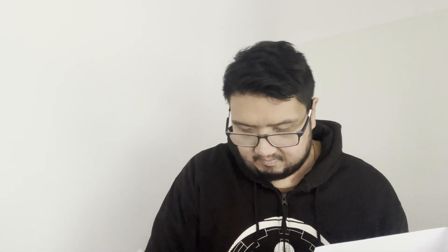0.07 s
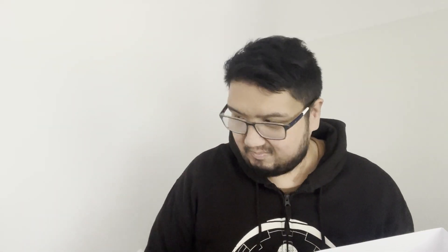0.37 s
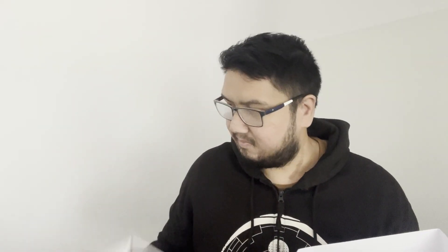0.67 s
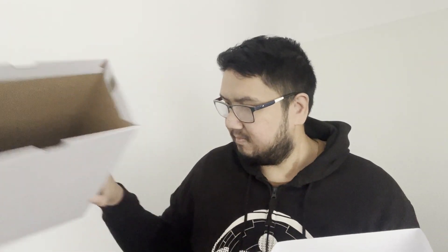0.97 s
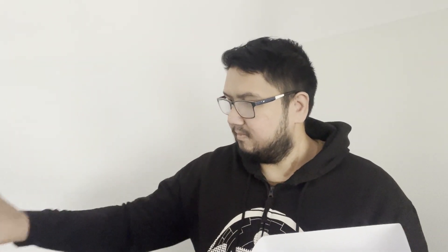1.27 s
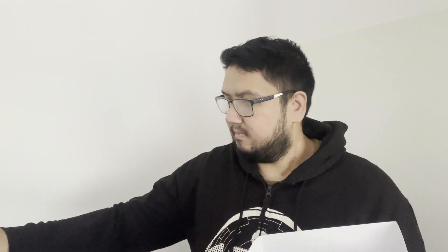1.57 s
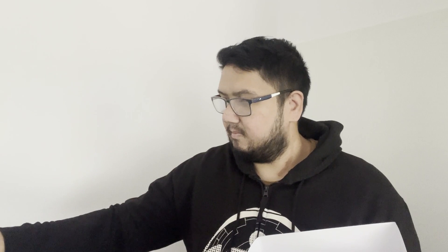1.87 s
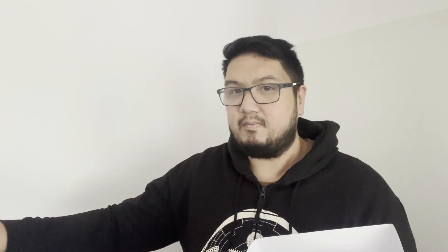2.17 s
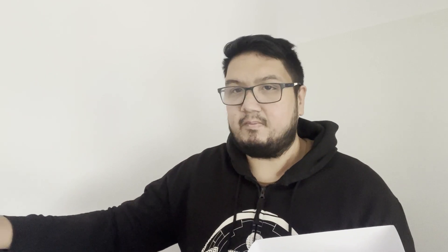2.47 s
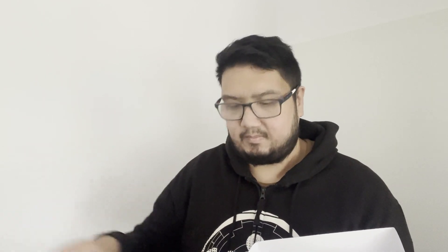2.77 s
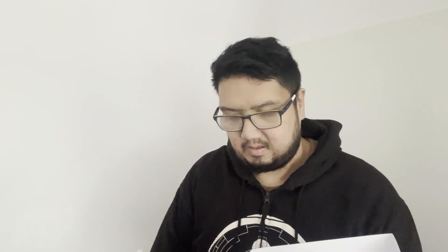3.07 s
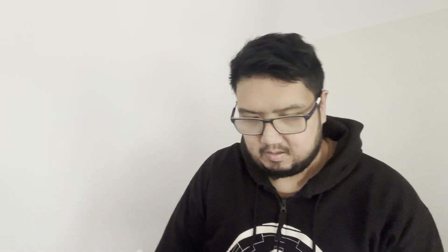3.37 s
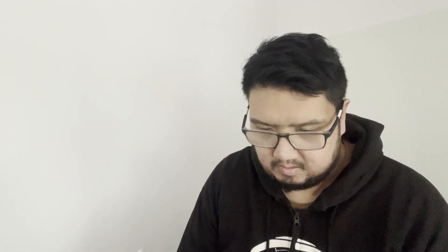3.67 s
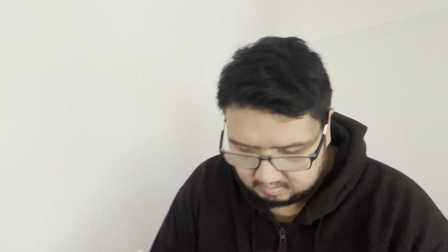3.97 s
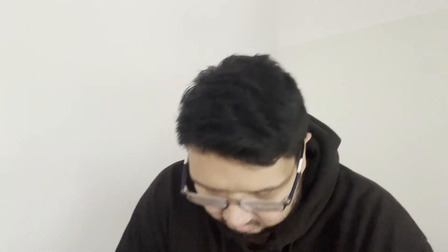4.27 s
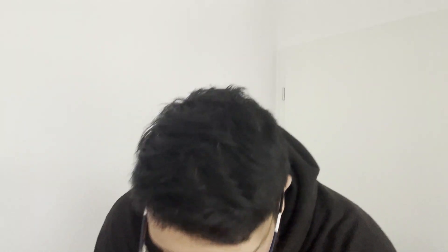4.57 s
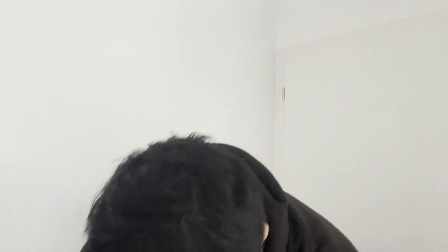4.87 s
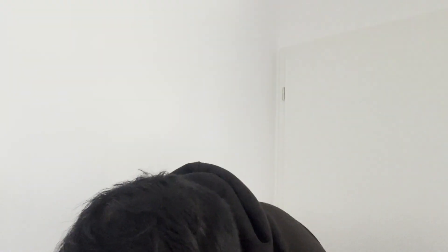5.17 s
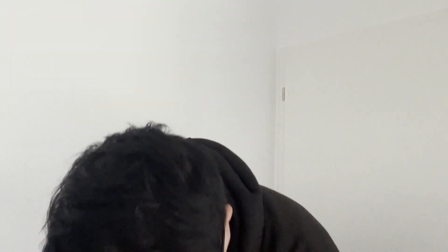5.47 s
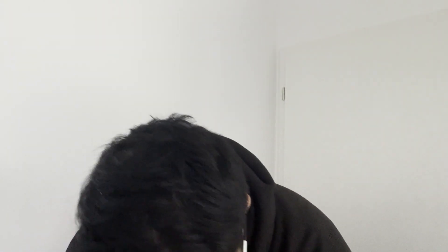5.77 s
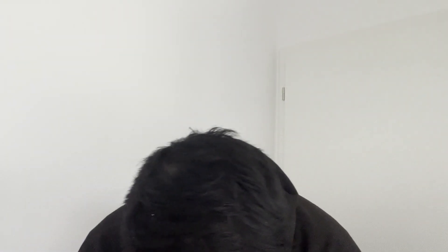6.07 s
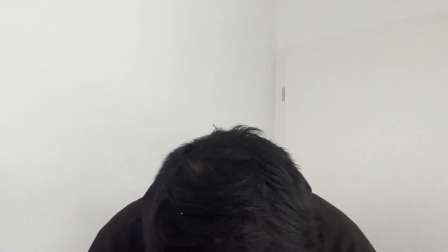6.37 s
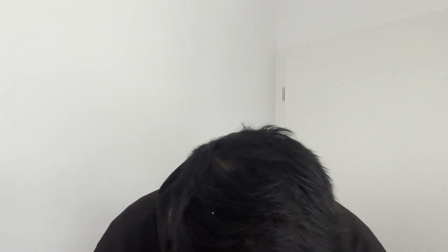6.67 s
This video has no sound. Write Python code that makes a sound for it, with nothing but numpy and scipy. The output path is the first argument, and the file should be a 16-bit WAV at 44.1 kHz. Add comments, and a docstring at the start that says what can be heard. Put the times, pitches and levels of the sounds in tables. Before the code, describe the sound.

Cardboard bumps and rubs as an empty box is lifted, then set down and tipped over on the left with two hollow knocks and a short skid. Slightly right of centre, hands dig through paper wrapping in a second box: hissing, crinkling and sharp crease snaps, mixed with scraping card and more knocks. The table rumbles softly underneath. Heard in stereo through two closely spaced microphones in a small bare room.

```python
"""A hollow bump and a rub of card: an empty cardboard box is lifted, set down on a table and tipped over,
off to the left. Then, a little right of centre, hands dig through paper wrapping in a second box.
Sliding card sticks and slips into its panel resonances, knocks ring the hollow box, paper hisses and its
creases snap, the table rumbles. Heard in a small bare room through two closely spaced microphones."""
import sys
import numpy as np
from scipy import signal
from scipy.fft import rfft, irfft, next_fast_len
from scipy.io import wavfile
from scipy.ndimage import uniform_filter1d, map_coordinates

SR = 44100
rng = np.random.default_rng(int(sys.argv[2]) if len(sys.argv) > 2 else 0)


def store_wav(level_fs):
    """Save 16-bit WAV to argv[1]."""
    pcm = np.round(np.clip(np.atleast_2d(level_fs), -1, 1) * 32767)
    wavfile.write(sys.argv[1], SR, pcm.T.astype(np.int16))


N = 305172
TOP_HZ = 16300  # nothing is heard above this


def amp(db):
    """Decibels to gain."""
    return 10 ** (np.asarray(db) / 20)


def unit(x):
    """Scale to rms 1."""
    return x / np.sqrt(np.mean(x ** 2) + 1e-20)


def along(points, hz):
    """Read (Hz, value) points on a log frequency axis."""
    point_hz, values = np.transpose(points)
    return np.interp(np.log(hz + 1), np.log(point_hz + 1), values)


def wobble(rate):
    """A smooth, bounded random curve, rate knots a second."""
    knots = 2 * np.tanh(rng.standard_normal(int(N * rate / SR) + 4) / 2)
    return map_coordinates(knots, [np.arange(N) * rate / SR])


def filtered(x, response):
    """Multiply the spectrum of x by response(hz)."""
    size = x.shape[-1]
    padded = next_fast_len(size + 8192)
    return irfft(rfft(x, padded) * response(np.fft.rfftfreq(padded, 1 / SR)), padded)[..., :size]


def add(track, s, sound):
    """Mix a sound into a track at s seconds."""
    start = max(round(s * SR), 0)
    part = sound[..., :max(N - start, 0)]
    track[:, start:start + part.shape[-1]] += part


# Resonances of bending card. Each row: centre in Hz, width in Hz, lift in dB when ring is 1.
PANEL_RESONANCES = [(179.7, 18, 11.5), (348, 40, 4.5), (500.6, 20, 8), (704, 48, 4.5), (860, 45, 4),
                    (1035, 23, 2.5), (1623, 62, 2.5)]
def coloured(x, spectrum, ring=0, size=4096):
    """Minimum-phase colour from (Hz, dB) points; ring lets the panel resonances stand out."""
    hz = np.fft.rfftfreq(size, 1 / SR)
    peaks_db = sum(db / (1 + (2 * (hz - centre) / width) ** 2) for centre, width, db in PANEL_RESONANCES)
    cepstrum = irfft(np.log(amp(along(spectrum, hz) + ring * peaks_db)))
    cepstrum[1:size // 2] *= 2
    cepstrum[size // 2 + 1:] = 0
    response = irfft(np.exp(rfft(cepstrum)))
    return signal.fftconvolve(x, response[None], axes=1)[:, :x.shape[1]]


# How alike left and right sound: wide in the middle, nearly mono in the treble.
# Each row: frequency in Hz, left-right correlation.
STEREO_LIKENESS = [(130, 0.94), (290, 0.77), (640, 0.48), (3000, 0.53), (5500, 0.15), (7500, 0.87),
                   (15000, 0.86)]
# The treble sounds centred. Each row: frequency in Hz, share of the left-right delay that applies there.
STEREO_LAG_SHARE = [(100, .3), (500, 1), (5200, 1), (7000, 0)]
def spread(pair, lag_ms=0.072):
    """Two unrelated signals become left and right, partly alike, the left later by up to lag_ms."""
    def blend(hz):
        angle = np.arccos(np.clip(along(STEREO_LIKENESS, hz), 0, 1)) / 2
        return np.array([np.cos(angle), np.sin(angle)])

    def delay(hz):
        lag_s = along(STEREO_LAG_SHARE, hz) * lag_ms / 1000
        return np.exp(1j * np.pi * hz * lag_s * np.array([[-1], [1]]))

    mid, side = filtered(pair, blend)
    return filtered(np.array([mid + side, mid - side]), delay)


def placed(pair, aside_from_s=0.796, aside_until_s=2.9):
    """Sound comes from the left while the empty box is aside, otherwise from a little to the right."""
    t = np.arange(N) / SR
    aside = uniform_filter1d(1. * ((t > aside_from_s) & (t < aside_until_s)), SR // 20)
    from_left = spread(pair * aside, lag_ms=-0.28) * amp([[.8], [-.4]])
    return from_left + spread(pair * (1 - aside), lag_ms=0.077)


def noise(spectrum):
    """Steady stereo noise, rms 1."""
    return unit(spread(coloured(rng.standard_normal((2, N)), spectrum)))


# The still room. Each row: frequency in Hz, relative density in dB.
ROOM_TONE_SPECTRUM = [(15, -41), (35, -8), (277, -7.5), (677, -24.5), (7920, -35.5), (10400, -56)]
def room_tone():
    """A faint, low hush all around the microphones."""
    return amp(-73.0) * noise(ROOM_TONE_SPECTRUM)


# Decay between the bare walls. Each row: frequency in Hz, seconds to fall 60 dB.
WALL_T60 = [(100, 0.134), (300, 0.58), (1000, 0.27), (4000, 0.6), (12000, 0.37)]
def room_echo(x):
    """The nearby walls answer 4 ms after the direct sound, each frequency dying at its own speed."""
    hz, t, bands = signal.stft(rng.standard_normal((2, SR * 3 // 4)), SR, nperseg=256)
    tail = signal.istft(bands * amp(-60 * t / along(WALL_T60, hz)[:, None]), SR, nperseg=256)[1]
    tail = np.pad(tail / np.linalg.norm(tail[0]), ((0, 0), (SR // 250, 0)))
    return spread(signal.fftconvolve(x.mean(0)[None], tail, axes=1)[:, :N])


# Rumble of the table under the boxes. Each row: frequency in Hz, relative density in dB.
RUMBLE_SPECTRUM = [(24, -47), (38, -3.5), (58, -8), (73, 7), (92, -5), (125, 0.5), (220, -62.5)]
# Weight landing on the table. Each row: start in seconds, level in dB.
TABLE_THUMPS = [(0.06, -34.5), (0.127, -32.5), (1.306, -36), (1.772, -37), (3.753, -39), (4.345, -30),
                (4.895, -34), (5.42, -35.5), (6.777, -39)]
def table_top(flex_gain, mode_hz=71.9, t60=0.25, rise_s=0.0051):
    """The table rumbles as the panels are worked and booms in its lowest mode when weight lands on it."""
    track = amp(-28.0) * (flex_gain + amp(-85.0)) ** 0.48 * noise(RUMBLE_SPECTRUM)
    t = np.arange(SR // 2) / SR
    boom = np.sin(2 * np.pi * mode_hz * t) * amp(-60 * t / t60) * (1 - np.exp(-t / rise_s))
    for s, db in TABLE_THUMPS:
        add(track, s, amp(db) * boom)
    return track


def burst(spectrum, t60, linger_db, linger_t60, ring=0):
    """A contact: a sharp crack and a weaker shiver after it, rms 1 at the start."""
    t = np.arange(SR // 3) / SR
    fade = amp(-60 * t / t60) + amp(linger_db - 60 * t / linger_t60)
    sound = coloured(rng.standard_normal((2, len(t))) * fade, spectrum, ring)
    return sound / np.sqrt(np.mean(sound[:, :SR // 250] ** 2))


# Thin paper ticking and stiff card cracking. Each row: frequency in Hz, relative density in dB.
TICK_SPECTRUM = [(900, -43), (2000, -3), (5000, 12.5), (8500, 11), (11000, -8.5), (16000, -5)]
CRACK_SPECTRUM = [(300, -10), (900, 6), (1700, 6.5), (3200, 0.5), (6500, -23)]
# The loudest creases and edges. Each row: start in seconds, tick level in dB, crack over the tick in dB.
CREASE_SNAPS = [(0.534, -76, 11), (0.96, -69, 14.5), (1.3012, -36, -4), (1.57, -54.5, -2.5),
                (1.939, -54, 0.5), (3.035, -58.5, -7), (3.4245, -43.5, -4), (3.4775, -38.5, -5),
                (3.49, -39, -6.5), (3.5328, -38.5, -12), (3.747, -51.5, 6.5), (4.0045, -41, -6.5),
                (4.022, -48, -4), (4.055, -42.5, -3), (4.675, -51.5, 4), (4.9253, -33, 2.5),
                (5.3491, -33, 1), (6.131, -44, -1), (6.25, -42, -15), (6.286, -43, -9),
                (6.499, -47.5, 10.5), (6.8394, -50.5, 10)]
def snaps(paper_gain, buckles_per_s=20, push_limit_db=-52):
    """Creases buckle with a dry tick, stiff card adds a lower crack; small ones give way at random."""
    track = np.zeros((2, N))
    for s, db, crack_db in CREASE_SNAPS:
        tick = burst(TICK_SPECTRUM, t60=.014, linger_db=-16, linger_t60=.12)
        crack = burst(CRACK_SPECTRUM, t60=.03, linger_db=-13, linger_t60=.12)
        add(track, s, amp(db) * (tick + amp(crack_db) * crack))
    push = np.minimum(paper_gain, amp(push_limit_db))  # pushing harder makes a small crease no louder
    gives_way = rng.random(N) < buckles_per_s / SR
    buckles = gives_way * push * amp(-2.5 + 6 * rng.random(N))
    tick, crack = (burst(spectrum, t60=0.0083, linger_db=-25.0, linger_t60=0.1)
                   for spectrum in (TICK_SPECTRUM, CRACK_SPECTRUM))
    small_snaps = signal.fftconvolve(buckles[None], tick + crack / 2, axes=1)[:, :N]
    return placed(track + small_snaps)


def crinkles(rate, pitch_hz, octaves, cycles, size_db):
    """Tiny facets of paper flip over, rate a second, each ringing for a few cycles at its own pitch."""
    count = int(rate * N / SR)
    when, pitch, size, side = rng.random((count, 4)).T[:, :, None]
    hz = np.minimum(pitch_hz * 2 ** (octaves * (2 * pitch - 1)), TOP_HZ)
    step = np.arange(SR // 150)
    turns = hz * step / SR
    strength = amp(-size_db * np.log(np.maximum(size, .02)))
    grains = strength * np.sin(2 * np.pi * turns) * np.exp(-turns / cycles)
    where = ((when * N).astype(int) + step).ravel()
    shares = np.cos(2 * np.pi * side), np.sin(2 * np.pi * side)
    return unit(np.array([np.bincount(where, (grains * share).ravel(), N)[:N] for share in shares]))


def crumpling(gain, flurry_db=-13.5, settle_s=.022):
    """Larger folds pop in clumps under the hands, and in a flurry after each loud snap."""
    t = np.arange(N) / SR
    flurries = sum((t > s) * amp(db + flurry_db) * np.exp(-np.abs(t - s) / settle_s)
                   for s, db, _ in CREASE_SNAPS)
    folds = crinkles(rate=400, pitch_hz=3000, octaves=1.5, cycles=5.5, size_db=3.8)
    clumps = amp(3.3 * wobble(30))
    return np.hypot(amp(-8.5) * gain, flurries) * unit(folds * clumps)


def slips(rate, size_db, smooth, clump_db, clump_rate):
    """Stick-slip: tiny jolts of uneven size, rate a second, coming in clumps over a smooth rub."""
    jolts = (rng.random(N) < rate / SR) * amp(size_db * np.minimum(rng.exponential(size=N), 4))
    rub = unit(jolts * rng.standard_normal((2, N))) + smooth * rng.standard_normal((2, N))
    return rub * amp(clump_db * wobble(clump_rate))


def box_echoes(x, depth, longest_s, rate, count=6):
    """Short echoes between the box walls come and go as the hands move, shifting the colour."""
    delays = (rng.uniform(.15, 1, count) * longest_s * SR).astype(int)
    return unit(x + sum(depth * wobble(rate) * np.roll(x, delay, axis=1) for delay in delays))


# Paper rubbing inside the box. Each row: frequency in Hz, relative density in dB.
HISS_SPECTRUM = [(1760, -33.5), (3000, -13), (5140, 1), (8280, 3.5), (9870, 0.5), (11800, -7),
                 (15100, -9.5), (16000, -28.5)]
def paper_hiss(slipping):
    """Sliding paper hisses while its smallest facets crinkle."""
    rub = box_echoes(coloured(slipping, HISS_SPECTRUM), depth=0.2, longest_s=.003, rate=12)
    facets = crinkles(rate=900, pitch_hz=5790, octaves=1.1, cycles=1.9, size_db=3.5)
    clumps = amp(3.2 * wobble(25))
    return unit(rub + 0.28 * facets * clumps)


# Card sliding along card with a hollow note. Each row: time of the peak in seconds, length in seconds,
# pitch at the peak in Hz, glide in octaves per second, peak level in dB.
CARD_SLIDES = [(1.05, 0.044, 5650, 2, -64), (3.2, .035, 1210, -4.5, -48), (4.144, .08, 1540, -2, -50),
               (4.275, 0.14, 980, -2, -42.5), (5.22, 0.23, 520, 0.5, -38), (5.331, 0.26, 190, -0.5, -39),
               (5.839, .05, 1110, -6.5, -36), (5.98, .13, 194, -1, -39), (6.33, .36, 498, -0.5, -50)]
def slides():
    """A push swells and fades in one broad card resonance, most often sinking as the panel comes free."""
    track = np.zeros((2, N))
    for s, length, hz, glide, db in CARD_SLIDES:
        t = np.arange(-length, length, 1 / SR)
        rub = slips(rate=630, size_db=2.5, smooth=0.79, clump_db=3.0, clump_rate=59.4)[:, :SR]
        note = unit(filtered(rub, lambda f: 1 / (1 + (2.83 * (f - hz) / hz) ** 2)))
        clock = np.cumsum(2 ** (glide * t))
        gliding = np.array([np.interp(clock, np.arange(SR), channel) for channel in note])
        add(track, s - length, amp(db) * np.exp(-(2 * t / length) ** 2) * gliding)
    return track


# Movements of the hands on card and paper. Each row: start, rise and hold in seconds, scrape level in dB,
# panel flex and paper hiss in dB over the scrape.
HAND_STROKES = [ (0.0, 0.00034, 0.051, -47.5, 2.5, -9.5), (0.048, 0.029, 0.21, -60.5, 8.5, -4.5),
                (0.938, 0.02, 0.37, -63, -5.5, -12.5), (1.221, 0.14, 0.011, -51.5, 3, -12),
                (1.714, 0.028, 0.065, -52.5, 2, -3.5), (2.967, 0.23, 0.075, -59.5, -3, -12),
                (3.178, 0.006, 0.035, -49, -4, -3), (3.222, 0.12, 0.35, -52.5, -5, -5),
                (3.473, 0.018, 0.12, -57, -5, 10.5), (3.708, 0.13, 0.039, -52.5, -0.5, -3),
                (3.88, 0.055, 0.21, -55, 0.5, -8), (4.077, 0.054, 0.15, -51.5, 1.5, -5.5),
                (4.269, 0.044, 0.03, -46.5, 0.5, -3.5), (4.336, 0.16, 0.3, -51, 3.5, 2.5),
                (4.804, 0.11, 0.091, -51, 5, 2.5), (4.95, 0.2, 0.17, -36.5, -1.5, -6.5),
                (5.3, 0.053, 0.034, -37, -2.5, -8), (5.502, 0.021, 0.047, -37.5, -8.5, -5),
                (5.638, 0.073, 0.028, -53.5, 3, -4), (5.792, 0.026, 0.072, -37, -3.5, -6),
                (5.891, 0.068, 0.02, -36, 0.5, -4.5), (6.024, 0.091, 0.41, -50.5, -1, -4.5),
                (6.295, 0.22, 0.031, -49.5, 5.5, 4.5), (6.6, 0.029, 0.26, -53, -1, -2), ]
# The box skidding. Each row: start and length in seconds, scrape level in dB, fade in dB per second.
BOX_SKIDS = [(1.299, 0.38, -45, 66.5), (1.753, .7, -54.5, 42.2)]
def effort(release_db_per_s=227, skid_flex_db=1.5, skid_paper_db=-7):
    """Gains of scrape, flex and hiss: strokes rise, hold and die as the hand lets go; skids fade."""
    t, power = np.arange(N) / SR, np.zeros((3, N))
    for s, rise, hold, db, flex_db, paper_db in HAND_STROKES:
        age = np.maximum(t - s, 0)
        fall_db = release_db_per_s * np.clip(age - rise - hold, 0, 1)
        stroke = np.minimum(age / rise, 1) * amp(db - fall_db)
        power += np.outer(amp([0, flex_db, paper_db]), stroke) ** 2
    for s, length, db, fade in BOX_SKIDS:
        skid = (t > s) * (t < s + length) * amp(db - fade * np.abs(t - s))
        power += np.outer(amp([0, skid_flex_db, skid_paper_db]), skid) ** 2
    return np.sqrt(power)


# Panels flexing and card scraping. Each row: frequency in Hz, relative density in dB.
FLEX_SPECTRUM = [(60, -51.5), (125, 1.5), (270, -1), (430, -8), (600, -31.5), (1200, -59.5)]
SCRAPE_SPECTRUM = [(200, -43), (400, -16), (520, -6), (950, -4), (2100, -11.5), (4800, -20), (9000, -82.5)]
def handling(scrape_gain, flex_gain, paper_gain):
    """Coarse slips flex the panels; mixed with finer ones they scrape the card and rub the paper."""
    coarse = slips(rate=800, size_db=-0.5, smooth=0.97, clump_db=1.87, clump_rate=55)
    fine = slips(rate=1800, size_db=1.5, smooth=1.0, clump_db=2.5, clump_rate=69)
    flex = flex_gain * unit(coloured(coarse, FLEX_SPECTRUM, ring=0.91))
    card = coloured(coarse + 0.61 * fine, SCRAPE_SPECTRUM, ring=0.6)
    scrape = scrape_gain * box_echoes(card, depth=0.3, longest_s=.005, rate=10)
    paper = paper_gain * paper_hiss(fine + 0.4 * coarse)
    return placed(flex + scrape + paper + slides() + crumpling(np.sqrt(scrape_gain * paper_gain)))


# Modes of the hollow box. Each row: frequency in Hz, relative level in dB, seconds to fall 60 dB.
BOX_MODES = [(138, 8.5, 0.1), (193.8, 1, 0.19), (271, 3.5, 0.13), (360, 7, 0.087), (429.7, -3.5, 0.2),
             (493.7, 9, 0.097), (810, 11, 0.075)]
# Card bumping against table, hands and contents; a landing runs from corner to face.
# Each row: start in seconds, thud level in dB, pitch in Hz, clap level in dB.
BOX_KNOCKS = [(0.002, -42, 328, -44.5), (0.249, -54, 463, -50), (0.315, -51, 550, -66),
              (1.288, -39, 475, -47.5), (1.302, -35, 700, -31.5), (1.313, -30, 245, -58),
              (1.345, -37, 260, -62), (1.711, -48.5, 260, -57), (1.7506, -35.5, 486, -43.5),
              (1.767, -38.5, 109, -68), (1.772, -39.5, 332, -60), (1.797, -42.5, 270, -62.5),
              (3.394, -44, 260, -52), (3.745, -49, 187, -54), (4.464, -36.5, 235, -44),
              (4.71, -42, 206, -46), (4.924, -30.5, 224, -31.5), (5.021, -32.5, 430, -36.5),
              (5.088, -33, 400, -46), (5.14, -34.5, 292, -34), (5.327, -40.5, 597, -41),
              (5.348, -48, 686, -27), (5.836, -41, 410, -42), (5.962, -37, 316, -31.5),
              (6.496, -40, 340, -33), (6.771, -41, 174, -42.5)]
def knocks():
    """A bump claps the card and rings the box modes near its pitch: a stiff corner high, a face low."""
    thuds, claps, t = np.zeros((2, N)), np.zeros((2, N)), np.arange(SR // 3) / SR
    hz, level, t60 = np.transpose(BOX_MODES)[:, :, None]
    for s, thud_db, pitch_hz, clap_db in BOX_KNOCKS:
        contact = [(pitch_hz / 3, -17), (pitch_hz, 0), (pitch_hz * 3, -26), (TOP_HZ, -90)]  # (Hz, dB)
        strength, detune, phase = rng.standard_normal((3, len(BOX_MODES), 1))  # grip shifts the modes
        fade = amp(level + along(contact, hz) + 2 * strength - 60 * t / t60)
        modes = np.sin(2 * np.pi * (hz * (1 + 0.027 * detune) * t + phase))
        ring = np.sum(fade * modes, 0) * (1 - np.exp(-2 * t * pitch_hz))
        ring /= np.std(ring[:SR // 50])
        jolt = burst(contact, t60=0.11, linger_db=-22.0, linger_t60=.2)
        jolt /= np.std(jolt[:, :SR // 50])
        add(thuds, s, amp(thud_db) * (ring * np.array([[1], [.6]]) + .33 * jolt))
        clap = burst(SCRAPE_SPECTRUM, t60=0.12, linger_db=-11.0, linger_t60=0.081, ring=1.0)
        add(claps, s, amp(clap_db) * clap)
    return placed(thuds), placed(claps)


def scene():
    """Rubbing, bumps and snaps in the small room, over the table's rumble and the room tone."""
    scrape_gain, flex_gain, paper_gain = effort()
    rubbing = handling(scrape_gain, flex_gain, paper_gain)
    thuds, claps = knocks()
    ticks = snaps(paper_gain)
    echo = room_echo(amp(-8.5) * rubbing + amp(-13.0) * thuds + amp(-6.5) * claps + amp(-4.0) * ticks)
    return rubbing + thuds + claps + ticks + echo + table_top(flex_gain) + room_tone()


def record(dry):
    """The left microphone is 0.7 dB louder than the right; nothing above the band limit is kept."""
    return filtered(dry, lambda hz: amp([[.35], [-.35]]) * (hz < TOP_HZ))


dry = scene()
out = record(dry)
store_wav(out)
```